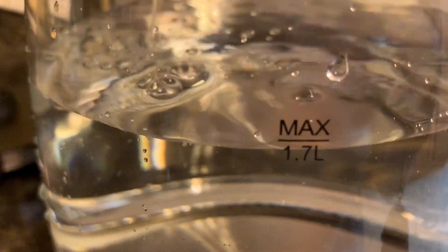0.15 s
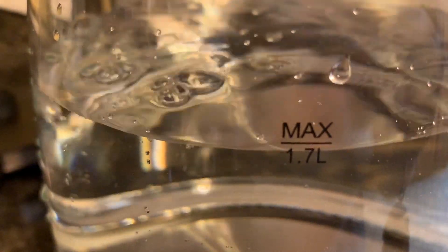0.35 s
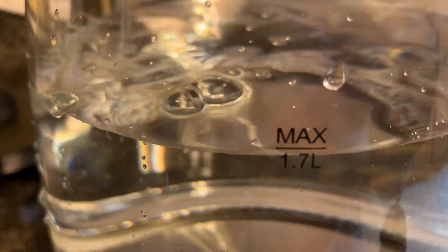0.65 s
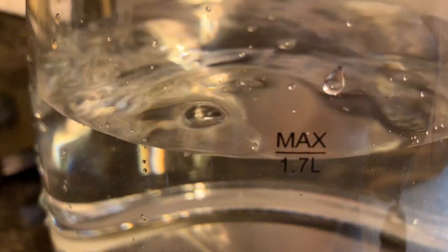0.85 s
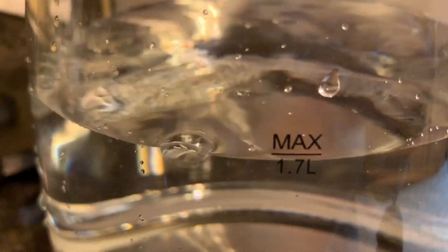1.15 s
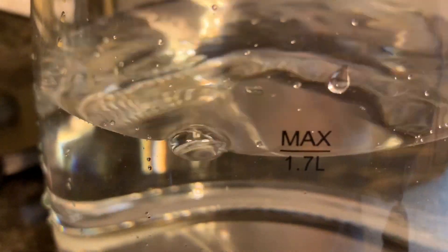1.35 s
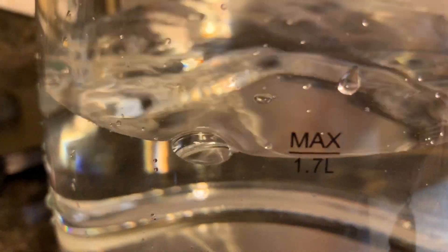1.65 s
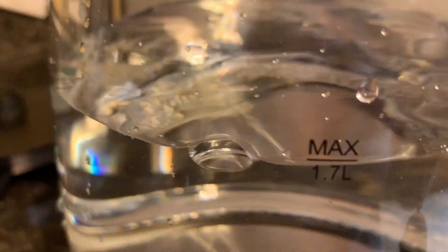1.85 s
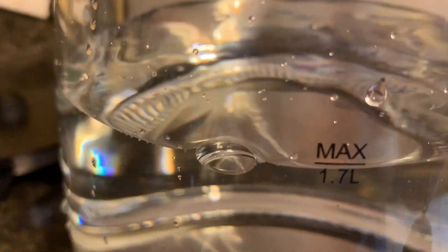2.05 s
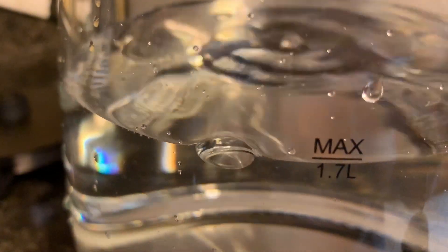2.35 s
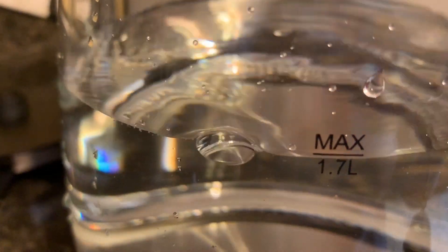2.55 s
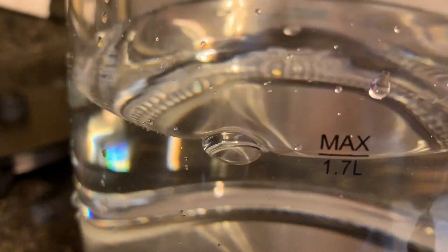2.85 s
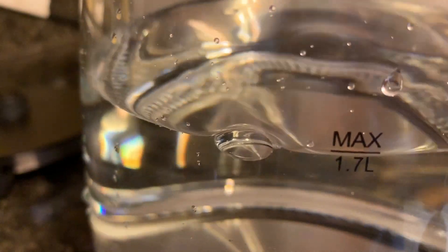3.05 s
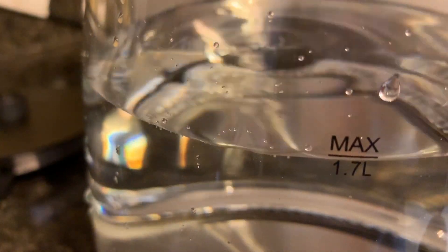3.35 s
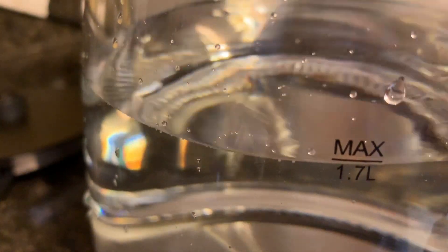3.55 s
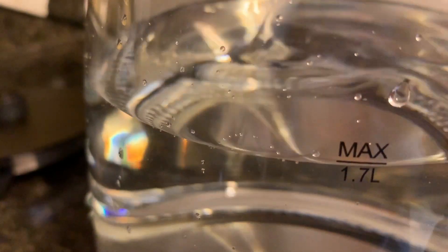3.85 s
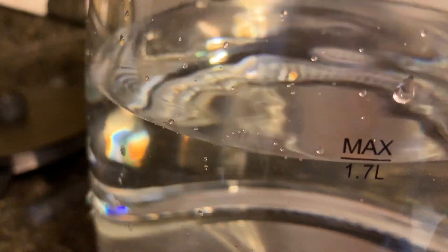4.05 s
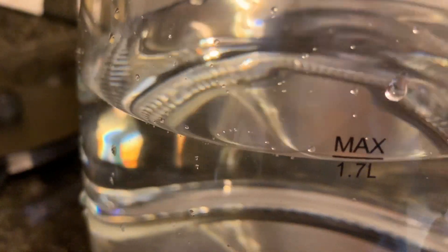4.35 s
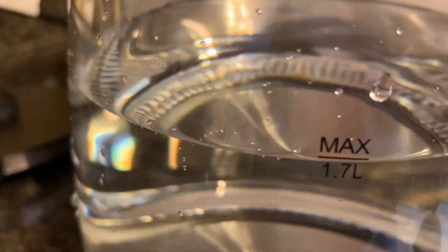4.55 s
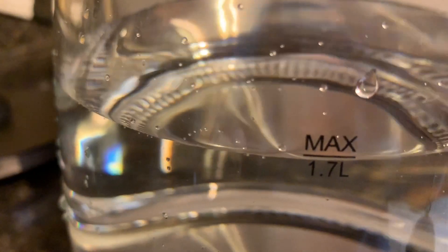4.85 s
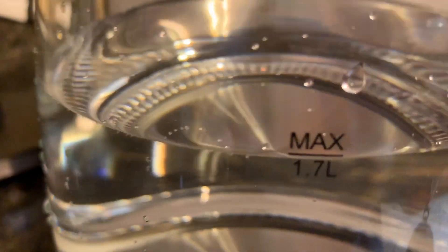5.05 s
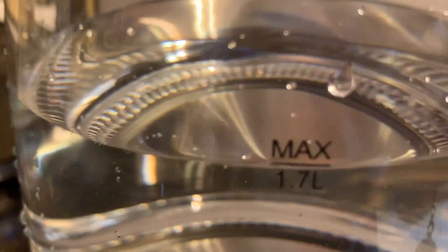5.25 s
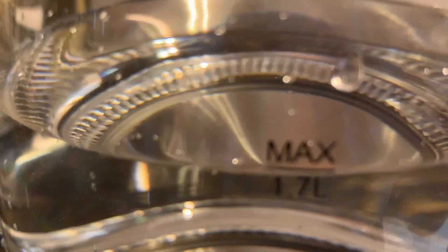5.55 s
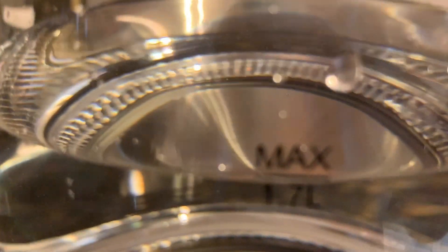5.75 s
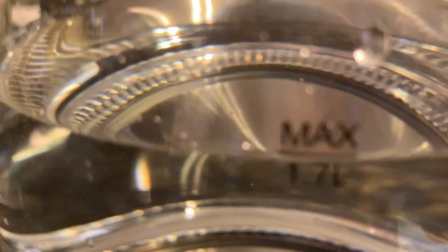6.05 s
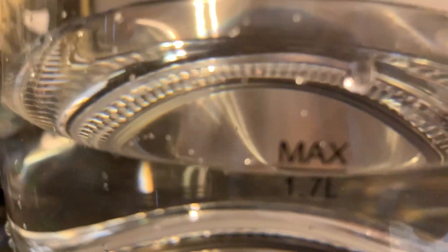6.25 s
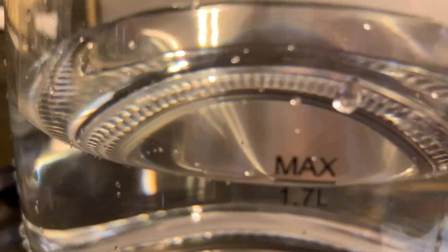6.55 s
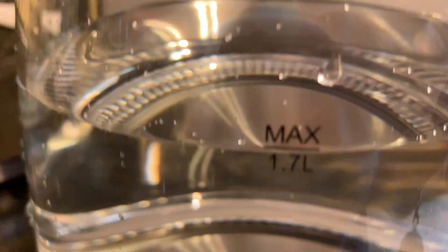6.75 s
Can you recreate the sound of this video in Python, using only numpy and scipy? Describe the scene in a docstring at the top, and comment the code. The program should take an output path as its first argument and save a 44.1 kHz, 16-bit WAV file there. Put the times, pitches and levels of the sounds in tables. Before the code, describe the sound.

Hot water gurgles and bubbles in a glass kettle and settles, then the kettle knocks on its base and rattles over a faint hum.

```python
"""A glass kettle of hot water gurgles, then knocks on its base and rattles, heard by a phone held close.
First the last bubbles ring the air and glass of the kettle and burst at the surface with bright ticks.
A few seconds later each knock rings the kettle's body and steel heating plate and shakes its loose parts.
Behind it all an appliance hums over the rumble of the kitchen."""
import sys
import numpy as np
from scipy import signal
from scipy.fft import rfft, irfft, next_fast_len
from scipy.io import wavfile
from scipy.ndimage import uniform_filter1d, map_coordinates

SR = 44100
rng = np.random.default_rng(int(sys.argv[2]) if len(sys.argv) > 2 else 0)


def transcribe(u):
    """Save the signal u as a 16-bit wav file named by the first command-line argument.

    u: samples, shape (n,) or (channels, n), limited to [-1, 1]; the rate is SR.
    q: integer samples, one column per channel.
    """
    v = np.clip(np.atleast_2d(u).T, -1, 1)
    q = np.round(v * 32767).astype(np.int16)
    wavfile.write(sys.argv[1], SR, q)


N = 304290


def amp(db):
    """Turn decibels into a number to multiply by."""
    return 10 ** (np.asarray(db) / 20)

def unit(x):
    """Scale a signal to an average (rms) strength of 1."""
    return x / np.sqrt(np.mean(x ** 2) + 1e-20)

def along(points, hz):
    """Read a value between (Hz, value) points, on a scale of octaves."""
    f, v = np.transpose(points)
    return np.interp(np.log(hz + 1), np.log(f + 1), v)

def wobble(rate):
    """A smooth curve through rate random values a second."""
    return map_coordinates(rng.standard_normal(int(N * rate / SR) + 4), [np.arange(N) * rate / SR])

def uneven(t, depth_db):
    """A fast flicker in loudness, as when close notes beat against each other."""
    return amp(depth_db * unit(uniform_filter1d(rng.standard_normal(len(t)), size=150)))

def filtered(x, response):
    """Boost, cut or delay each frequency of x as response says."""
    n = x.shape[-1]
    size = next_fast_len(n + SR // 4)
    return irfft(rfft(x, size) * response(np.fft.rfftfreq(size, 1 / SR)), size)[..., :n]

def resonance(f, hz, width):
    """A filter that passes hz fully and weakens the frequencies around it."""
    return 1j * f * width / (hz * hz - f * f + 1j * f * width)

def noise(spectrum):
    """Two unrelated noises shaped by (Hz, dB) points."""
    return unit(filtered(rng.standard_normal((2, N)), lambda f: amp(along(spectrum, f))))

def dying(t, t60, rise):
    """A soft start, then a fade. The ring time t60 is the seconds it takes to fall 60 dB."""
    return amp(-60 * t / max(t60, .003)) * (1 - np.exp(-t / max(rise, 1e-5)))

def add(track, start, sound):
    """Mix a sound in at a start time in seconds."""
    part = track[max(round(start * SR), 0):][:len(sound)]
    part += sound[:len(part)]

# The kitchen's echo. Each row: frequency in Hz, ring time in seconds.
ECHO_TIMES = [(100, 0.069), (1000, 0.36), (4000, 0.39), (12000, 0.16)]
def echo(time_scale, seconds):
    """Reflections die away, each frequency at its own speed."""
    hz, t, spectrum = signal.stft(rng.standard_normal(round(seconds * SR)), SR, nperseg=128)
    fade = amp(-60 * t / (time_scale * along(ECHO_TIMES, hz)[:, None]))
    tail = signal.istft(spectrum * fade, SR, nperseg=128)[1]
    return tail / np.linalg.norm(tail)

def in_room(track, start, sound, echo_db):
    """Add a sound and its echo: row 0 is what both microphones share, row 1 is how they differ."""
    size = next_fast_len(len(sound) + SR // 10)
    smear = rfft(echo(time_scale=0.048, seconds=0.038), size)  # blurs the timing, hardly the tone
    scattered = amp(-1.5) * irfft(rfft(sound, size) * smear / np.abs(smear) ** .75, size)
    for row, direct in zip(track, (sound, scattered)):
        add(row, start, direct)
        add(row, start + .006, amp(echo_db) * signal.fftconvolve(sound, echo(time_scale=1, seconds=.35)))

# The room's rumble and a faint hiss. Each row: frequency in Hz, relative level in dB.
RUMBLE_SHAPE = [(15, -42), (26, -18), (40, -11.5), (52, -9), (68, -8.5), (87, -16), (115, -11.5),
                (222, -12.5), (255, -19), (288, -15.5), (389, -18), (466, -21), (629, -28.5), (1650, -42.5),
                (3000, -62), (3900, -80.5), (6600, -120)]
HISS_SHAPE = [(1500, -39.5), (2500, 3), (4660, -3), (6600, -4), (10000, -4.5), (13700, -1.5), (16500, -7)]
def room_noise(rumble_db=-48, hiss_db=-80.5, rustle_db_per_s=51.5):
    """The room rumbles under a faint hiss, and three soft rustles swell and fade."""
    t = np.arange(N) / SR
    rumble = amp(rumble_db + wobble(3.19)) * noise(RUMBLE_SHAPE)
    peaks = [(2.66, -76), (6.08, -76), (6.9, -66)]  # seconds, dB
    swells = sum(amp(db - rustle_db_per_s * abs(t - when)) for when, db in peaks)
    rustle_shape = [(800, -7), (2500, 4), (4000, -3.5), (6000, -11.5), (9000, -12), (14000, -8)]
    rustles = swells * amp(1.2 * wobble(31)) * noise(rustle_shape)
    return rumble + rustles + amp(hiss_db) * noise(HISS_SHAPE)

# The appliance's tones. Each row: pitch in Hz, relative level in dB, width of the flutter in Hz.
HUM_TONES = [(51.5, -59, 6.1), (58.8, -47.5, 14), (115.3, -67, 2.7), (223, -66, 6.9), (293.4, -61.5, 14),
             (358.7, -60.5, 13), (463, -63, 18), (1900, -77, 45)]
def appliance_hum():
    """Steady tones waver because a narrow band of noise surrounds each one."""
    track, t = np.zeros((2, N)), np.arange(N) / SR
    for hz, db, width in HUM_TONES:
        flutter = unit(filtered(rng.standard_normal((2, N)), lambda f: resonance(f, hz, width) ** 2))
        track += 0.49 * amp(db) * flutter
        track[0] += 1.2 * amp(db) * np.sin(2 * np.pi * hz * t)
    return track

# The pitches the kettle's inside favours. Each row: pitch in Hz, width in Hz, relative level in dB.
VESSEL_PEAKS = [(575, 24, 2), (1355, 22, -4), (1530, 30, -4), (1650, 22, -1)]
def vessel(f):
    """The air and water in the kettle boost the sounds near their own pitches."""
    return 0.46 + 3 * sum(amp(db) * resonance(f, hz, width) for hz, width, db in VESSEL_PEAKS)

# The glass wall's clearest note: pitch in Hz, ring time in seconds, rise time in seconds.
GLASS_NOTE = (2600, 0.065, 0.0031)
def glass_ring(t):
    """The glass wall rings briefly and unevenly."""
    hz, t60, rise = GLASS_NOTE
    flicker = uneven(t, depth_db=3.5)
    return flicker * np.sin(2 * np.pi * hz * t + rng.uniform(0, 2 * np.pi)) * dying(t, t60, rise)

def bubble_note(t, hz, glide_octaves, t60):
    """A short note whose pitch climbs as the bubble nears the surface."""
    pitch = hz * 2 ** (glide_octaves * (.5 - np.exp(-t / 0.01291)))
    phase = 2 * np.pi * np.cumsum(pitch, axis=-1) / SR
    return np.sin(phase) * amp(-60 * t / t60) * (1 - np.exp(-t / 0.001))

def simmer(count=800, level_db=-53, settle_db_per_s=8.5, stop_s=1.4, stop_db_per_s=180):
    """Many small bubbles under a fine spray fade as the water settles, then quickly stop."""
    track, fizz, t = np.zeros((2, N)), np.zeros(2 * SR), np.arange(SR // 25) / SR
    when, size, pitch = rng.uniform(0.000986, 1, (count, 3)).T
    hz = 800 * 2 ** (1.5 * pitch[:, None])
    notes = bubble_note(t, hz, glide_octaves=0.51, t60=22 / hz)
    for start, db, note in zip(2.3 * when, -3 * np.log(size), notes):
        add(fizz, start, amp(db) * note)
    fizz = filtered(fizz, lambda f: vessel(f) + 3 * resonance(f, GLASS_NOTE[0], 30))
    droplets = rng.standard_normal(N) * amp(6 * wobble(50) + 3 * wobble(300))
    spray = filtered(droplets, lambda f: resonance(f, 3800, 4900) ** 2)[:len(fizz)]
    elapsed = np.arange(len(fizz)) / SR
    fade = amp(level_db - settle_db_per_s * elapsed - stop_db_per_s * np.maximum(elapsed - stop_s, 0))
    in_room(track, 0, (unit(fizz) + amp(-15) * unit(spray)) * fade, echo_db=-20)
    return track

# Clear plinks. Each row: start in seconds, level in dB, pitch in Hz, ring time in seconds.
DROP_PLINKS = [(0.154, -41, 3280, 0.022), (1.173, -36.5, 5460, 0.0455), (1.305, -48.5, 8480, 0.052),
               (1.903, -48, 3230, 0.18), (1.902, -52.5, 7200, 0.11), (2.965, -44, 10600, 0.064),
               (2.977, -46, 4484, 0.068), (2.977, -44, 6980, 0.084)]
def plinks():
    """Short clear notes, as of drops striking glass or steel."""
    track, t = np.zeros((2, N)), np.arange(SR // 5) / SR
    for start, db, hz, t60 in DROP_PLINKS:
        note = np.sin(2 * np.pi * hz * t) * dying(t, t60, 0.0008)
        in_room(track, start, amp(db) * uneven(t, depth_db=2) * note, echo_db=-14)
    return track

# Bubbles bursting. Each row: start in seconds, peak level in dB, pitch of the open hollow in Hz.
SURFACE_BURSTS = [(0.0024, -37, 12100), (0.0216, -32.5, 6620), (0.0469, -23.5, 12200), (0.0765, -21, 11000),
                  (0.2276, -26, 11860), (0.311, -29.5, 7030), (0.351, -40, 8240), (0.428, -52, 11440),
                  (0.4405, -25, 8340), (0.4918, -43.5, 15300), (0.516, -44, 7040), (0.537, -50, 4660),
                  (0.535, -37.5, 15000), (0.601, -53, 8100), (0.627, -41, 4856), (0.677, -47, 8600),
                  (0.695, -45.5, 9160), (0.737, -50.5, 10360), (0.769, -64.5, 7230), (0.832, -39, 15000),
                  (0.9025, -46.5, 12000), (0.943, -50, 15300), (0.95, -45, 3850), (0.988, -42.5, 15600),
                  (1.1267, -31.5, 11100), (1.1448, -34.5, 7000), (1.173, -32.5, 6560),
                  (1.2548, -40.5, 12500), (1.293, -46, 4165), (1.307, -50, 7800), (1.354, -45.5, 11000),
                  (1.422, -53.5, 6500), (1.699, -55.5, 7080), (1.866, -53, 15300), (1.904, -31.5, 7700),
                  (2.474, -59, 8850), (2.9233, -57, 8710), (2.9657, -45, 10770), (2.9763, -40, 8100),
                  (3.4466, -54, 15200), (4.1799, -57, 11100)]
def bursts(octaves_below=0.62, octaves_above=1.12):
    """A bursting bubble sprays a puff of hiss around the pitch of the hollow it leaves."""
    track, t = np.zeros((2, N)), np.arange(SR // 5) / SR
    fade = dying(t, 0.0435, 0.00062) + 0.13 * dying(t, 0.15, .003)  # the pop, then drops falling back
    for start, db, hz in SURFACE_BURSTS:
        droplet_hz = rng.uniform(3000, 16000, (8, 1))
        def colour(f):
            droplets = 0.35 + 1.9 * resonance(f, droplet_hz, 0.039 * droplet_hz).sum(axis=0)
            reach = np.where(f < hz, octaves_below, octaves_above)
            puff = np.exp(-(np.log2(f / hz + 1e-3) / reach) ** 2)
            return droplets * puff + 1.93 * resonance(f, hz, 0.036 * hz)
        tick = filtered(rng.standard_normal(len(t)), colour) * fade
        in_room(track, start, amp(db) * tick / np.abs(tick).max(), echo_db=-14.5)
    return track

# Large bubbles. Each row: start in seconds, peak level in dB, pitch in Hz, level of the glass in dB.
LARGE_BUBBLES = [(0.003, -29, 1213, -39), (0.028, -25.5, 1234, -32.5), (0.08, -27, 482, -37),
                 (0.127, -43, 1293, -45), (0.13, -41.5, 1790, -57), (0.211, -34.5, 596, -69),
                 (0.275, -48, 1280, -72), (0.282, -50, 1615, -68), (0.314, -37.5, 1185, -54),
                 (0.329, -28.5, 1110, -36), (0.451, -34, 1200, -42.5), (0.469, -36, 1114, -48),
                 (0.518, -22, 1158, -40), (0.532, -35, 1210, -45), (0.546, -39.5, 1557, -40),
                 (0.605, -34, 1620, -35.5), (0.876, -64, 670, -56), (0.885, -53, 2010, -40),
                 (0.92, -45.5, 875, -56), (0.989, -43, 858, -23), (1.128, -27.5, 923, -60),
                 (1.175, -42, 926, -67), (1.256, -60, 1730, -38), (1.361, -46.5, 1040, -68),
                 (1.396, -56, 1810, -43), (1.916, -30.5, 1217, -51)]
def gurgle(churn_ends_s=0.6):
    """Each large bubble sets the air and glass of the kettle ringing and throws a little splash."""
    track, t = np.zeros((2, N)), np.arange(SR // 5) / SR
    for start, db, hz, glass_db in LARGE_BUBBLES:
        colour = lambda f: resonance(f, 1.09 * hz, 0.76 * hz) ** 2 + 0.21 * resonance(f, 2500, 4400) ** 2
        splash = filtered(rng.standard_normal(len(t)) * dying(t, 0.065, 0.0029), colour)
        churning = start < churn_ends_s
        glide_octaves = .28 if churning and hz > 900 else .05
        t60 = 0.053 * min(hz / 1000, 1, 1300 / hz)  # low and high bubbles die sooner
        t60 *= amp(-0.3 * (db + 35))  # so do loud ones
        t60 *= 1 if churning else 1.63  # in calm water they ring longer
        note = filtered(bubble_note(t, hz, glide_octaves, t60) + 0.86 * splash, vessel)
        sound = amp(db) * note / np.abs(note).max() + amp(glass_db) * glass_ring(t)
        in_room(track, start - .001, sound, echo_db=-18.5)
    return track

def struck_notes(table, t, ring_scale):
    """A struck object rings with several notes, at slightly new strengths on every blow."""
    return [amp(db + rng.normal(0, 1)) * np.sin(2 * np.pi * hz * t) * dying(t, ring_scale * t60, 1 / 1200)
            for hz, db, t60 in table]

# The kettle's hard contacts. Each row: start in seconds, level in dB before filtering.
HARD_CONTACTS = [(4.3306, -19.5), (5.343, -48.5), (5.486, -31.5), (5.495, -50), (5.522, -33.5),
                 (5.587, -64), (5.628, -75)]
def snaps():
    """A hard contact gives a short, bright snap of noise."""
    track, t = np.zeros((2, N)), np.arange(SR // 3) / SR
    for start, db in HARD_CONTACTS:
        grit = rng.standard_normal(len(t)) * dying(t, 0.054, .0002)
        snap = filtered(grit, lambda f: resonance(f, 8200, 9000) ** 2)
        in_room(track, start, amp(db) * snap, echo_db=-18.5)
    return track

# The notes of the kettle's body and of its steel heating plate.
# Each row: pitch in Hz, relative level in dB, free ring time in seconds.
BODY_NOTES = [(123, -11.5, 0.15), (399.4, -12, 0.31), (566, -6, 0.39), (576, -12.5, 0.5), (768, -11, 0.26),
              (1030, 8, 0.11), (1190, -4, .3), (1352, 0.5, 0.252), (1608, 8, 0.032), (2391, -8, 0.1),
              (2820, -9, 0.042)]
PLATE_NOTES = [(2070, 0, 0.22), (3200, -15, 0.1), (4795, -14, 0.27), (6830, -20, 0.1), (8180, -19, 0.18)]
# The kettle knocking on its base. Each row: start in seconds, levels in dB of the low body notes, the
# upper body notes and the plate, then multipliers for the body's ring time and pitch.
BASE_KNOCKS = [(4.335, -5.5, -24, -34, 0.32, 0.999), (5.335, -29.5, -36, -40.5, 0.36, 1.06),
               (5.443, -33, -48.5, -49, 1, 1.1), (5.474, -43, -37, -60, 0.12, 0.68),
               (5.484, -15.5, -24, -50, 0.091, 1.01), (5.493, -27, -28, -55, 0.16, 1.06),
               (5.505, -19, -49, -67, 0.088, 1.095), (5.52, -20.5, -29, -64, 0.12, 1.07),
               (5.543, -28.5, -36.5, -64, 0.22, 1.08), (5.589, -32.5, -41.5, -70, 0.26, 1.04),
               (5.631, -53, -50.5, -71.5, 0.41, 1.03), (6.031, -53.5, -64, -74, 0.16, 1.3)]
def knocks():
    """Every knock rings the body and the plate at new strengths, with a short crack and a thud."""
    track, t = np.zeros((2, N)), np.arange(SR // 3) / SR
    body_hz = np.array(BODY_NOTES)[:, 0]
    low, deep = body_hz < 900, body_hz < 450
    hardest_db = BASE_KNOCKS[0][1]
    for start, low_db, upper_db, plate_db, ring_scale, tuning in BASE_KNOCKS:
        deep_db = 0.95 * (low_db - hardest_db)  # lighter knocks stir the deepest notes less
        levels_db = np.where(low, low_db + deep * deep_db, upper_db)
        body = amp(levels_db) @ struck_notes(np.array(BODY_NOTES) * [tuning, 1, 1], t, ring_scale)
        plate_notes = struck_notes(PLATE_NOTES, t, ring_scale=0.94)
        plate = amp(plate_db) * sum(uneven(t, depth_db=2.5) * note for note in plate_notes)
        hit = dying(t, 0.037, 0.0006)
        short_grit = rng.standard_normal(len(t)) * hit
        long_grit = rng.standard_normal(len(t)) * (hit + .2 * dying(t, 0.12, 0.0031))
        crack = amp(upper_db - 34) * filtered(short_grit, lambda f: 1j * f / (3000 + 1j * f))
        thud = amp(upper_db + 6) * filtered(long_grit, lambda f: resonance(f, 1500, 2400) ** 2)
        in_room(track, start, body + plate + crack + thud, echo_db=-13)
    return track

def rattle(contacts_per_s=1500, rise_s=.008, hold_s=.006, t60=.099):
    """After each knock loose parts chatter in tiny contacts; the harder they hit, the brighter."""
    track, force, t = np.zeros((2, N)), np.zeros(N), np.arange(SR // 4) / SR
    shake = np.minimum(t / rise_s, 1) * amp(-60 * np.maximum(t - hold_s, 0) / t60)
    for start, _, upper_db, *_ in BASE_KNOCKS:
        add(force, start, amp(upper_db - 4.5) * shake)
    contacts = rng.standard_normal(N) * (rng.random(N) < contacts_per_s / SR) * amp(4.5 * wobble(90))
    dull = filtered(contacts, lambda f: resonance(f, 800, 350) ** 2 + 1.4 * resonance(f, 900, 1500) ** 2)
    bright = filtered(contacts, lambda f: resonance(f, 2700, 6000) ** 2)
    brightness = 0.25 * np.sqrt(force / force.max())
    in_room(track, 0, force * (unit(dull) + brightness * unit(bright)), echo_db=-15)
    return track

# How alike the two microphones sound. Each row: frequency in Hz, likeness (1 means the same).
LIKENESS = [(60, 0.91), (400, 0.87), (1000, 0.66), (1500, 0.05), (5500, 0.041), (7500, 0.64), (15000, 0.94)]
# How much louder the left one is. Each row: frequency in Hz, left over right in dB.
LEFT_LOUDER = [(60, 0), (130, 1.5), (600, 1), (2000, 1.5), (3000, -0.5), (5500, -2.5), (7000, -1),
               (15000, 1)]
# How much later the left one hears the treble. Each row: frequency in Hz, delay in seconds.
LEFT_LATER = [(800, 0), (2500, .000258), (16000, .000258)]
def scene():
    """Two microphones hear bass and top treble alike; the phone and the room scatter the middle."""
    mix = gurgle() + simmer() + bursts() + plinks() + knocks() + snaps() + rattle()
    mix += appliance_hum() + room_noise()
    spread = lambda f: np.arccos(np.clip(along(LIKENESS, f), -1, 1)) / 2
    shared, side = filtered(mix, lambda f: np.array([np.cos(spread(f)), np.sin(spread(f))]))
    left = lambda f: amp(along(LEFT_LOUDER, f) / 2) * np.exp(-1j * np.pi * f * along(LEFT_LATER, f))
    return filtered(np.array([shared + side, shared - side]), lambda f: np.array([left(f), 1 / left(f)]))

def record(dry):
    """The microphones soften the highest treble, and the phone cuts off what lies above its limit."""
    limit_hz = 16500
    droop = lambda hz: amp(along([(10000, -0.5), (13000, -4.5), (16000, -7)], hz))
    return filtered(dry, lambda hz: droop(hz) / (1 + (hz / limit_hz) ** 160))

dry = scene()
out = record(dry)
transcribe(out)
```